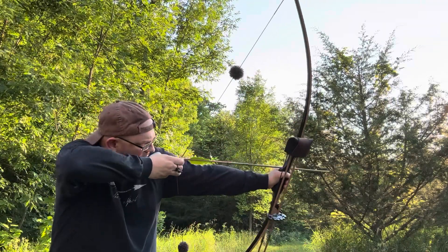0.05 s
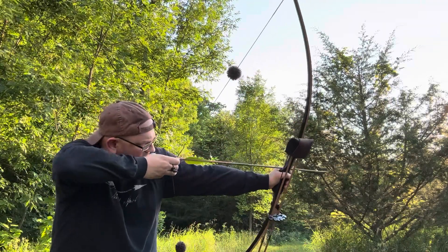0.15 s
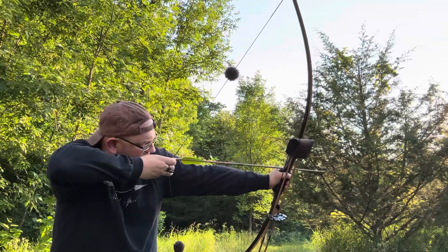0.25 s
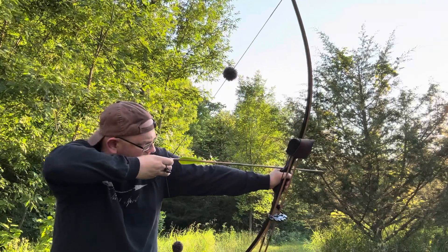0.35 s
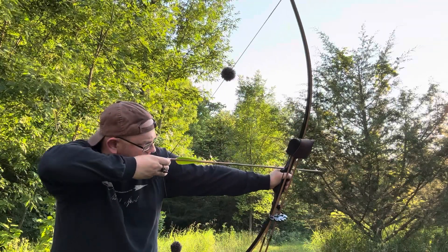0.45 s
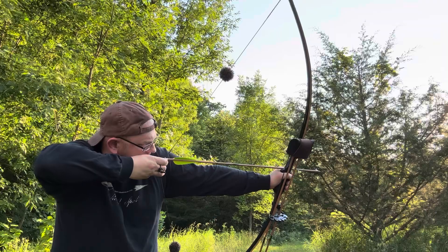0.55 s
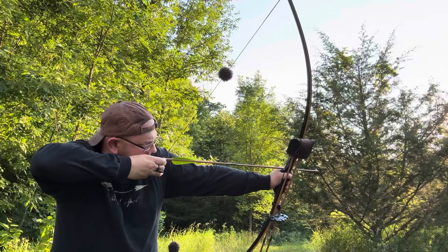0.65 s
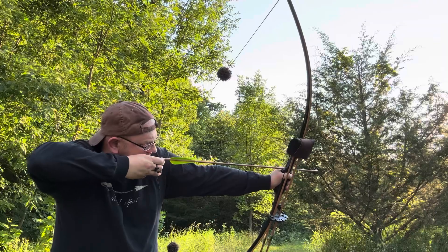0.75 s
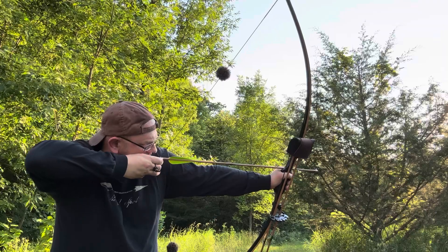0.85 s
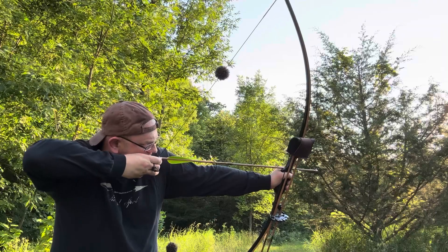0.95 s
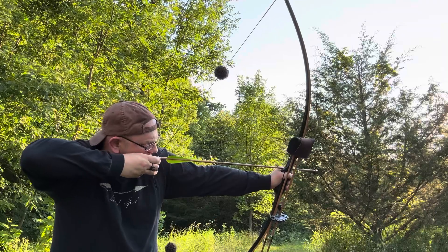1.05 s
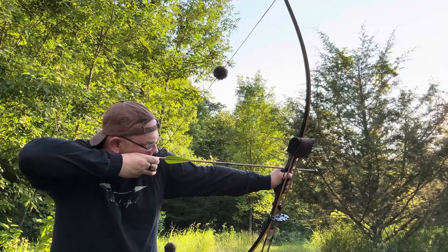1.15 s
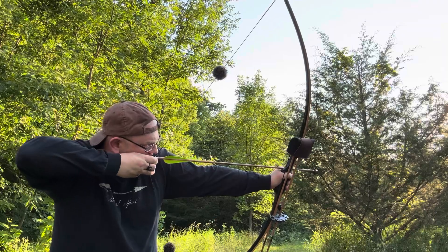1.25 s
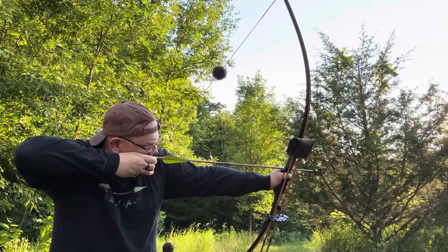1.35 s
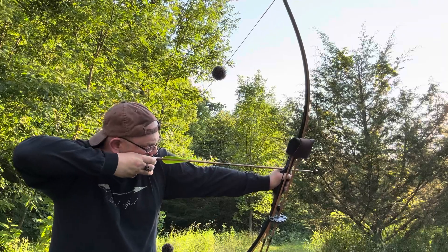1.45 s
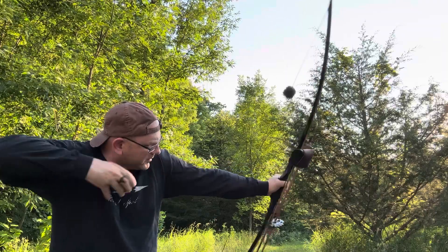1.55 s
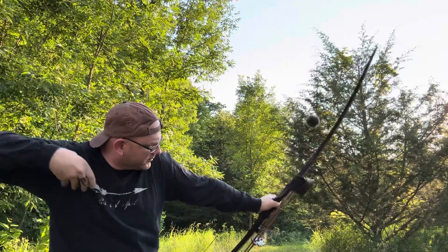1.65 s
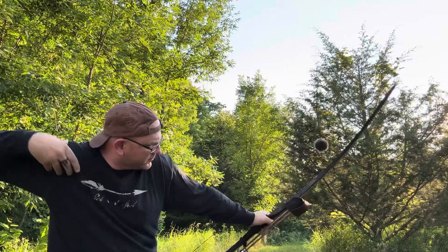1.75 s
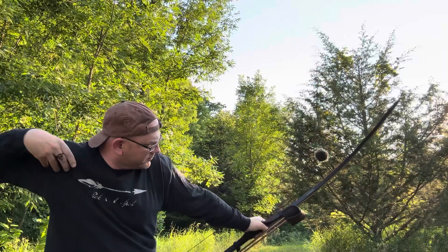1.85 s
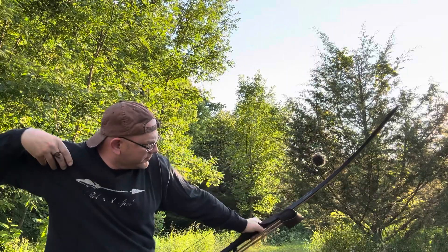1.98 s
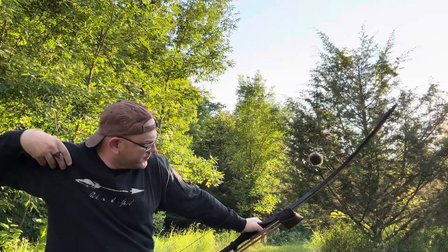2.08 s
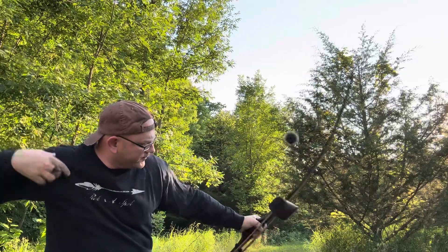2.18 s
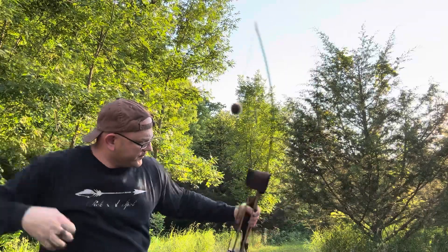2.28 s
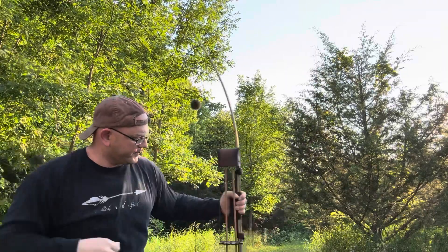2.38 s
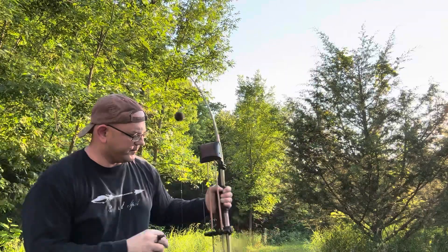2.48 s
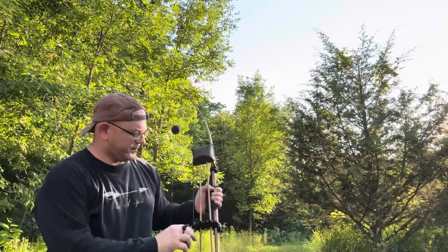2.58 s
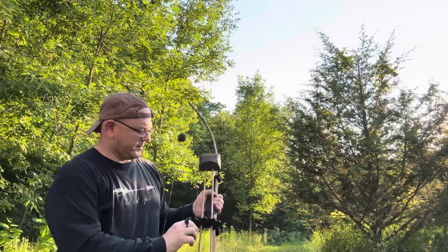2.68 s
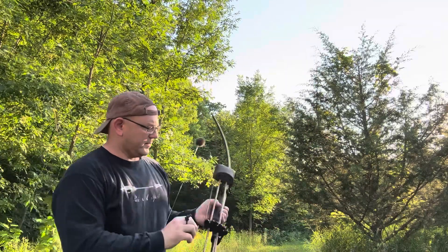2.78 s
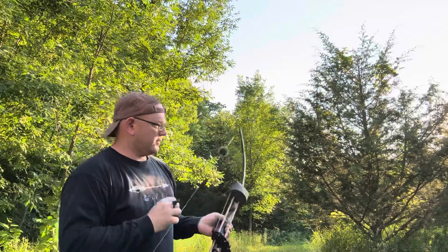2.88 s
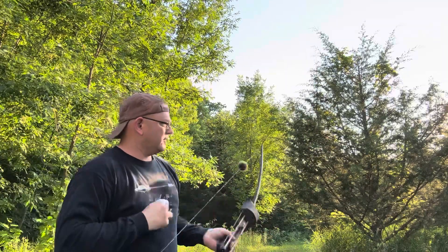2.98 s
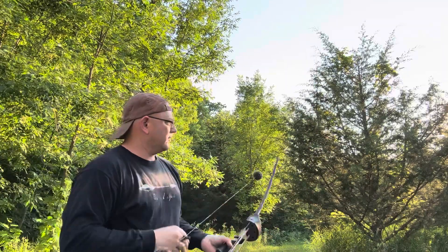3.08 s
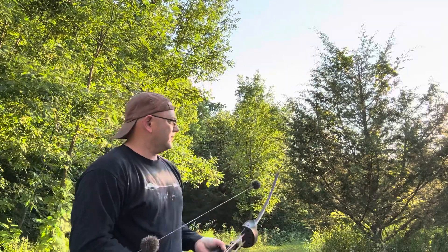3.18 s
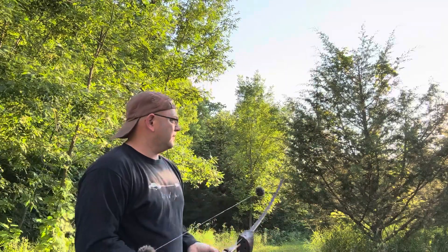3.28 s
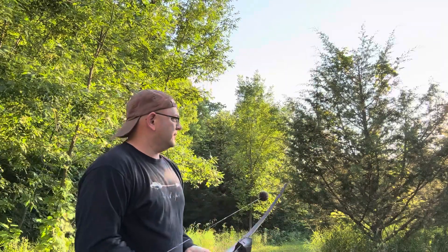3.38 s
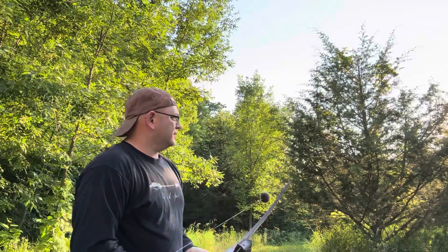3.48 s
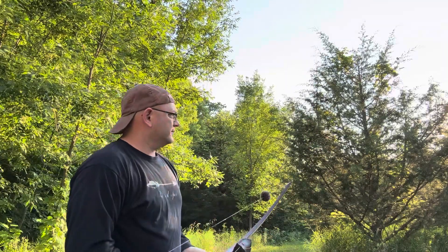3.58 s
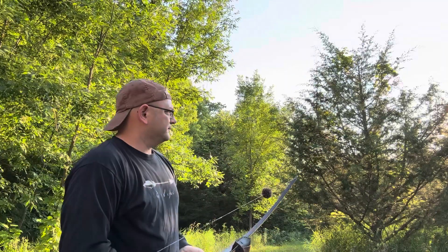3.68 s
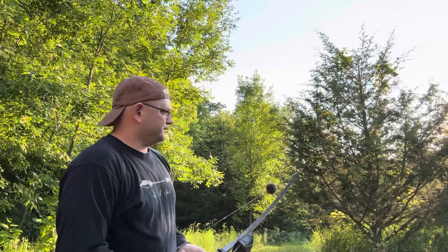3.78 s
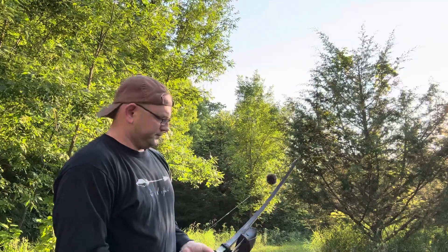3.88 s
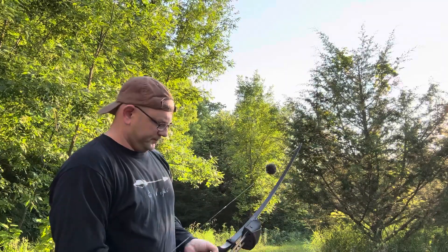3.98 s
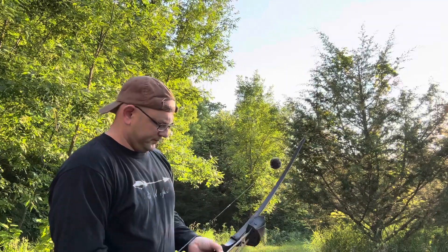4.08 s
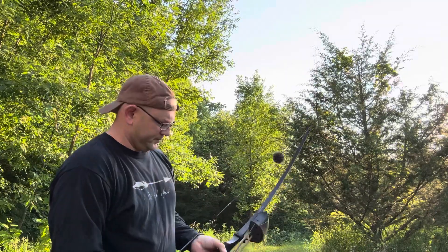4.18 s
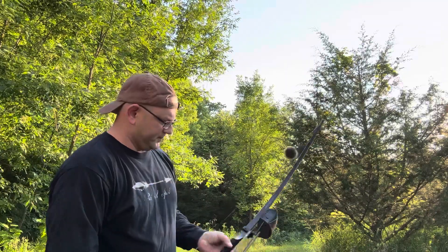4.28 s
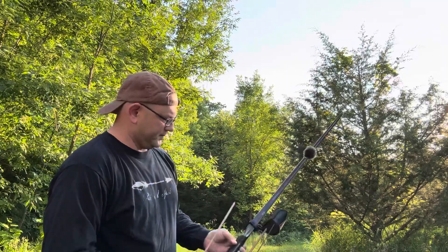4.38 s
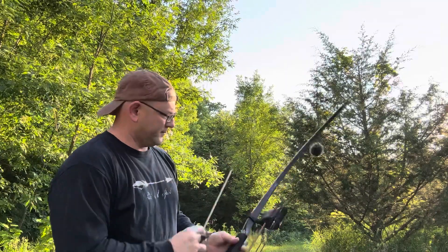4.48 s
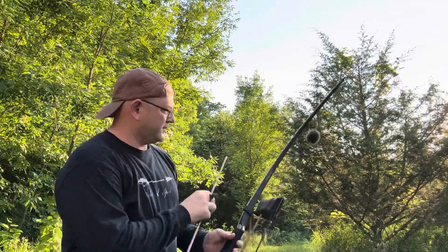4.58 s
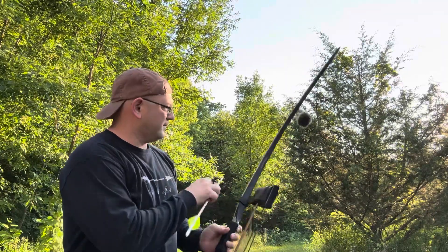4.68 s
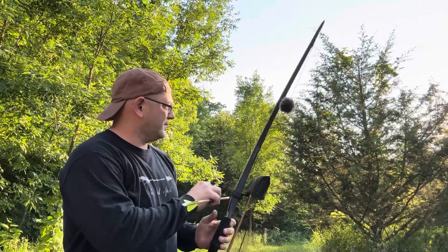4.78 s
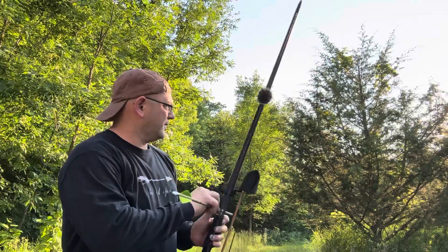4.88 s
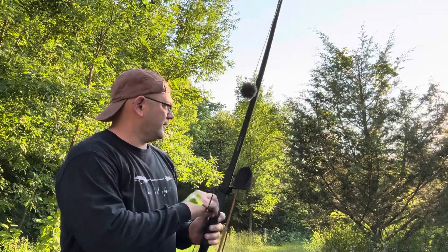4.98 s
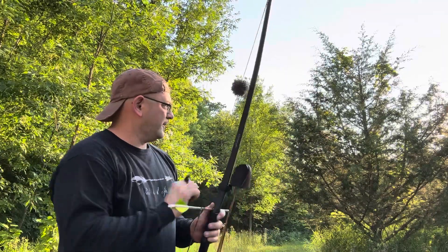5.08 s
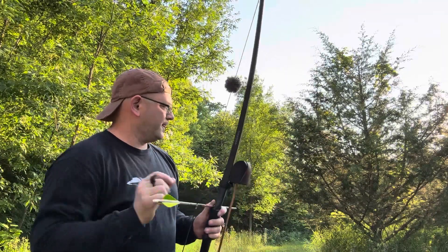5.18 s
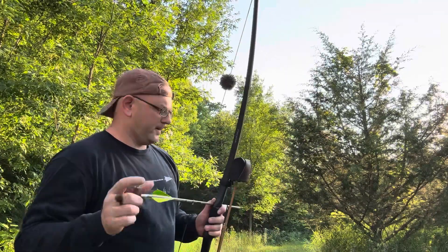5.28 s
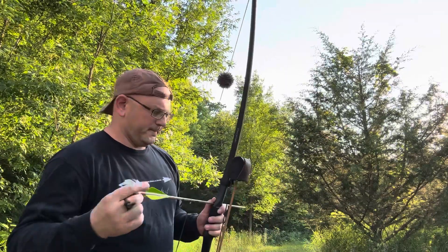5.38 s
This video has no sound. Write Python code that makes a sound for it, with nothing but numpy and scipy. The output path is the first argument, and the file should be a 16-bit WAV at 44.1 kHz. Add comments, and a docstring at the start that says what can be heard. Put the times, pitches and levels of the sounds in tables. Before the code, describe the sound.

A quiet grassy clearing heard from one microphone near the archer: low far traffic, a droning engine that swells softly around 1 s, faint leaf hiss and high insect trills, stronger from 2 to 3.5 s. A far buzzy bird calls at 0.1 s. At 1.47 s the longbow releases close by, a very short bright crack with shaft scrape and low limb thump. At 1.68 s a minute falling chirp leads straight into the arrow smacking the target farther off, with a boomy thud and echoes from the trees. Sleeves rustle from 2.4 s, strongest near 3.1 s. The bird buzzes again at 3.35 to 3.65 s, ending on a clear accent. Around 4.0 to 4.2 s the next arrow rubs grittily and knocks, snapping out of its clip with a crisp click at 4.24 s. Shaft knocks come at 4.9 s, finger slides at 5.15 s, then two tiny quick chirps and a rustle at 5.4 s.

```python
"""A grassy clearing, one microphone: far traffic rumbles, an engine swells, insects trill, sleeves rustle, a bird buzzes.
Close by, a longbow is shot: a crack of ringing modes, scrapes of coloured noise, a low thump of the limbs.
A fifth of a second later, on the heels of a tiny falling glide, the arrow smacks into the target farther off,
and the trees echo. The next arrow is taken up with rustles, slides of gritty noise and clicks; two more glides end it.
Insects are narrow bands of noise; the bird and the glides are swept sines; echoes are decaying noise in bands."""
import sys
import numpy as np
from scipy import signal
from scipy.fft import rfft, irfft, next_fast_len
from scipy.io import wavfile

SR = 44100
rng = np.random.default_rng(int(sys.argv[2]) if len(sys.argv) > 2 else 0)


def generate_wav(sig):
    """Save sig (samples, or channels by samples) to the path in sys.argv[1] as 16-bit PCM at SR."""
    pcm = np.round(np.clip(np.atleast_2d(sig).T, -1, 1) * 32767).astype(np.int16)
    wavfile.write(sys.argv[1], SR, pcm)


N = 239707
TIME = np.arange(N) / SR


# In all tables: t60/s is the time to fall by 60 dB, rise/s the time of the last 10 dB up to the peak.
# Colours give only the shape of a spectrum; the noise made from them has unit power.


def amp(db):
    """Decibels to gain."""
    return 10 ** (np.asarray(db) / 20)


def rms_one(x):
    """Scale to unit power."""
    return x / np.sqrt(np.mean(x ** 2) + 1e-20)


def at_hz(rows, hz):
    """Each column of a spectrum at the given frequencies, read along a logarithmic axis."""
    points, *columns = np.transpose(rows)
    return [np.interp(np.log(hz), np.log(points), column) for column in columns]


def drift(rate):
    """Random wander about zero, with a new target 'rate' times a second."""
    return np.interp(TIME * rate, np.arange(N), rng.standard_normal(N))


def noise(colour, grain_db=0):
    """Noise of a given colour; uneven grain sizes make it gritty."""
    size = next_fast_len(N)
    grains = rng.standard_normal(N) * amp(grain_db * drift(2500))
    bins_hz = np.arange(size // 2 + 1) * SR / size + 1e-3   # just above zero for the logarithm
    gain = amp(at_hz(colour, bins_hz)[0])
    return rms_one(irfft(rfft(grains, size) * gain, size)[:N])


def band(x, low_hz, high_hz, order=2):
    """Causal band-pass."""
    edges = np.clip([low_hz, max(high_hz, 1.2 * low_hz)], 10, .47 * SR)
    return signal.sosfilt(signal.butter(order, edges, "band", fs=SR, output="sos"), x)


def whistle(hz):
    """A unit-power sine that follows a pitch curve."""
    return np.sqrt(2) * np.sin(2 * np.pi * np.cumsum(hz) / SR)


def held(start, length, attack, release):
    """Envelope that fades in, holds at one and fades out within its length."""
    fade_in = (TIME - start) / attack
    fade_out = (start + length - TIME) / release
    return np.clip(np.minimum(fade_in, fade_out), 0, 1)


def swell(s, db, rise, t60):
    """Envelope that grows to a peak at s and dies away, both exponentially."""
    growing_db = 10 * (TIME - s) / rise
    dying_db = -60 * (TIME - s) / t60
    return amp(db + np.maximum(np.where(TIME < s, growing_db, dying_db), -200))


def strokes(rows):
    """Each rubbing stroke builds up, holds and dies away; their powers add."""
    power = 0
    for s, db, rise, hold, t60 in rows:
        before_db = 10 * np.maximum(s - TIME, 0) / rise
        after_db = 60 * np.maximum(TIME - s - hold, 0) / t60
        power = power + amp(db - np.minimum(before_db + after_db, 200)) ** 2
    return np.sqrt(power)


def strike(s, modes, contact):
    """A blow sets every mode ringing; a longer contact lets them build up more slowly."""
    age = np.clip(TIME - s, 0, 1)
    live = (age > 0) & (age < 1)
    t, out = age[live], np.zeros(N)
    for k, (hz, db, t60) in enumerate(modes):
        decay = np.exp(-np.log(1000) * t / t60)
        out[live] += (-1) ** k * amp(db) * decay * np.sin(2 * np.pi * hz * t)   # signs alternate
    return out * (1 - np.exp(-age / contact))


def radiated(s, db, low_hz, high_hz):
    """Summed over all directions, a crack is a broad, smooth pulse."""
    return amp(db) * band(signal.unit_impulse(N, round(s * SR)), low_hz, high_hz, order=1)


# Echoes of the clearing, near from ground and bushes, far from the trees; each source adds its own levels:
# f/Hz, near level/dB, near t60/s, far level/dB, far t60/s
CLEARING_ECHOES = [(100, -8, 0.46, -2.5, .8), (400, 0.5, .22, -1, .9), (895, 3, 0.2, -2, 0.57),
                   (2290, 1.5, 0.19, -1, 0.8), (5000, -1, .23, 3, 0.49), (7900, 1, 0.29, 0, 0.6),
                   (11000, -3, .18, -10.5, .35), (15000, -6.5, .16, -16.5, .25)]


def echoes(x, near_db, far_db):
    """Dense scatter from nearby, then a long faint return from the trees that loses its treble first."""
    t, response = TIME[:SR], 0
    edges = np.geomspace(60, 17000, 13)
    for low, high in zip(edges, edges[1:]):
        near, near_t60, far, far_t60 = at_hz(CLEARING_ECHOES, np.sqrt(low * high))
        near_path = (near + near_db, near_t60, .006)
        far_path = (far + far_db, far_t60, .025)
        for db, t60, build_s in (near_path, far_path):
            shape = np.exp(-np.log(1000) * t / t60) * (1 - np.exp(-(t / build_s) ** 2))
            scatter = band(rng.standard_normal(SR), low, high)
            response = response + amp(db) * scatter * shape / np.linalg.norm(shape)
    return signal.fftconvolve(x, response)[:N]


# Colour of the far traffic: f/Hz, level/dB
TRAFFIC_COLOUR = [(20, -42.5), (35, -20.5), (55, -1), (80, 1), (130, 3.5), (170, -9), (225, -9.5),
                  (280, -14), (400, -17.5), (750, -15), (1000, -23), (1700, -38.5), (3000, -43),
                  (5000, -65)]
# Colour of the rough part of the engine's drone: f/Hz, level/dB
ENGINE_COLOUR = [(60, -23.5), (95, -3.5), (120, 0.5), (140, -6), (210, -11.5), (300, -31)]
# Colour of the hiss of leaves: f/Hz, level/dB
LEAF_COLOUR = [(1500, 10.5), (3000, 3), (6000, 4), (10000, -11.5), (16000, -32)]
# The far engine drones on, fading, and swells once
ENGINE_DB, ENGINE_FADE_DB_PER_S, ENGINE_ONSET_S = -57.5, 2.5, 0.69
ENGINE_PEAK_S, ENGINE_PEAK_DB, ENGINE_SWELL_S = 1.06, -50.5, .36


def background(engine_hz=116, hum_hz=210):
    """Far traffic, one droning engine rising out of it, a faint steady hum and a hiss of leaves."""
    traffic = amp(-58.78) * noise(TRAFFIC_COLOUR)
    tone = amp(-4) * whistle(engine_hz + 2.2 * drift(12))
    roughness = amp(-2.5) * rms_one(band(noise(ENGINE_COLOUR), 50, 350))
    onset = np.minimum(TIME / ENGINE_ONSET_S, 1) ** 2
    receding = amp(ENGINE_DB - ENGINE_FADE_DB_PER_S * TIME) * onset
    swelling = amp(ENGINE_PEAK_DB) * np.exp(-((TIME - ENGINE_PEAK_S) / ENGINE_SWELL_S) ** 2)
    engine = (receding + swelling) * (tone + roughness)
    hum = amp(-70.5) * whistle(hum_hz + 2 * drift(5.4))
    leaves = amp(-78.5) * noise(LEAF_COLOUR)
    return traffic + engine + hum + leaves


# Insects that pulse and swell: f/Hz, mean level/dB
CHIRPERS = [(5280, -86.5), (5680, -86)]
# Bouts of one trilling insect: start t/s, length/s, level/dB
TRILLS = [(1.0, .9, -80), (2.04, 1.52, -77)]
TRILL_FADE_S = 0.11


def insects(trill_hz=4900, swells_per_s=1.7):
    """Rasping wings make narrow bands: one insect trills in bouts, the others pulse and swell at a loose pace."""
    blur = [(20, 5.5), (170, 4), (330, -11), (800, -47), (2000, -91)]   # offset from centre f/Hz, level/dB
    bouts = sum(amp(db) * held(start, length, TRILL_FADE_S, TRILL_FADE_S) for start, length, db in TRILLS)
    out = bouts * noise(blur) * whistle(np.full(N, trill_hz))
    for k, (hz, db) in enumerate(CHIRPERS):
        swelling_db = 3 * (-1) ** k * whistle(swells_per_s + .4 * drift(3.6))   # they start out in opposition
        level = amp(db + swelling_db + 2.5 * drift(50))
        out = out + level * noise(blur) * whistle(hz + 60 * drift(9.1))
    return out


# Strokes of a sleeve as the arms move, before the grit and flicker:
# t/s, level/dB, rise/s, hold/s, t60/s
SLEEVE_STROKES = [(0.01, -71.5, .05, 0.016, 1.45), (1.348, -77.5, .008, .01, .08),
                  (2.46, -60.5, 0.098, 0.042, .22), (2.62, -65.5, .015, .003, .25),
                  (2.72, -72.5, .03, .15, .5), (2.975, -60.5, 0.048, 0.017, .35),
                  (3.11, -53.5, 0.092, 0.082, 0.34), (3.42, -69, .04, 0.033, .9),
                  (3.70, -71, 0.16, 0.27, 0.48), (3.89, -68.5, 0.066, .005, .15),
                  (4.33, -74, .1, .29, 0.71), (5.41, -67, 0.042, 0.031, 0.23)]
# Colour of cloth on cloth: f/Hz, level/dB
SLEEVE_COLOUR = [(250, -19.5), (450, -5.5), (850, -1), (1700, -3.5), (3600, 0), (7600, 0.5), (10000, -7),
                 (12500, -11.5), (16000, -12)]
# The treble gains this many dB for each dB of stroke above the plain level
SLEEVE_BRIGHTENS, SLEEVE_PLAIN_DB = .2, -67


def sleeves():
    """Cloth on cloth: the harder the stroke, the brighter its grit."""
    level = strokes(SLEEVE_STROKES)
    cloth = noise(SLEEVE_COLOUR, grain_db=3)
    treble_gain = (level / amp(SLEEVE_PLAIN_DB)) ** SLEEVE_BRIGHTENS
    extra_treble = (treble_gain - 1) * band(cloth, 6500, 16000, order=1)
    return level * (cloth + extra_treble) * amp(1.5 * drift(70))


def handling():
    """Cloth rubs, and the next arrow slides and knocks on the bow, with the clearing's echoes."""
    rubs = sleeves() + slides() + ticks()
    return rubs + echoes(rubs, near_db=-14.5, far_db=-27.5)


# Buzzy bird calls; the level is before the closing accent and the flutter, the echo is a trim:
# start t/s, length/s, closing pitch f/Hz, fall to it f/Hz, level/dB, echo level/dB
BUZZ_CALLS = [(.09, .30, 2602, 169, -67.5, 4), (3.355, .308, 2445, 440.6, -63, -3.5)]
BUZZ_ATTACK_S, BUZZ_RELEASE_S = 0.02, 0.0057
BUZZ_ACCENT_DB, BUZZ_ACCENT_S = 8.5, .04   # the whistle at the end is accented
BUZZ_FALL_S = .13   # the pitch settles
# The sweep opens quickly, narrows with this power of the call's progress, and is almost gone in the whistle
BUZZ_OPEN_S, BUZZ_SWEEP_HZ, BUZZ_NARROWING = .025, 316, 3.44
BUZZ_WHISTLE_S, WHISTLE_SWEEP_HZ = 0.02, 30


def buzzes(buzz_hz=85):
    """A far bird sweeps its whistle up and down fast enough to buzz; each call sinks, narrows, ends on an accent."""
    out = 0
    for start, length, closing_hz, fall_hz, db, echo_db in BUZZ_CALLS:
        age = np.clip(TIME - start, 0, length)
        hz = closing_hz + fall_hz * np.exp(-age / BUZZ_FALL_S)
        progress = np.minimum(age / (length - BUZZ_WHISTLE_S), 1)
        opening = 1 - np.exp(-age / BUZZ_OPEN_S)
        sweep_hz = WHISTLE_SWEEP_HZ + BUZZ_SWEEP_HZ * opening * (1 - progress ** BUZZ_NARROWING)
        flutter = whistle(buzz_hz * (1 + .07 * drift(40))) / np.sqrt(2)
        accent_db = BUZZ_ACCENT_DB * np.exp((age - length) / BUZZ_ACCENT_S)
        pulsing_db = 2.95 * np.roll(flutter, SR // 400)   # loudness lags pitch by 2.5 ms
        level = held(start, length, BUZZ_ATTACK_S, BUZZ_RELEASE_S) * amp(db + accent_db + pulsing_db)
        call = level * whistle(hz + sweep_hz * (flutter + .25 * drift(200)))
        out = out + call + amp(echo_db) * echoes(call, near_db=.5, far_db=-2.5)
    return out


# Light knocks and brushes of shaft, nock and fingers on the bow:
# t/s, level/dB, low edge f/Hz, high edge f/Hz, t60/s
TICKS = [(1.4358, -56, 700, 4500, 0.013), (1.5094, -18.5, 3460, 8300, .004), (2.492, -51, 397, 3510, 0.053),
         (3.09, -54, 3265, 5500, 0.22), (3.2, -46.5, 202, 1500, .05), (4.006, -44.5, 349, 2150, 0.043),
         (4.049, -42, 3270, 7850, .008), (4.157, -41.5, 396, 4000, .03), (4.47, -51.5, 403, 2486, 0.02),
         (4.552, -56, 2000, 12780, 0.0094), (4.897, -38.5, 886, 5300, 0.019),
         (4.9756, -40, 1200, 6600, 0.022)]
# Knocks that set the shaft ringing: t/s, level added to the modes/dB
SHAFT_KNOCKS = [(4.8964, -0.5), (4.976, -14)]
# Ringing of the arrow shaft, before the knock's level: f/Hz, level/dB, t60/s
SHAFT_MODES = [(1830, -45, 0.039), (2145, -46, 0.03), (2980, -37.5, .02)]


def ticks():
    """Each light knock is a brief burst in its own band; two of them ring the shaft."""
    white = rng.standard_normal(N)
    out = np.zeros(N)
    for s, db, low, high, t60 in TICKS:
        out += swell(s, db, .0003, t60) * rms_one(band(white, low, high, order=3))
    for s, db in SHAFT_KNOCKS:
        out += amp(db) * strike(s, SHAFT_MODES, contact=0.00043)
    return out


# Bow and arrow as the string lets go: f/Hz, level/dB, t60/s
RELEASE_MODES = [(520, -17, 0.091), (783, -20, 0.042), (965, -11.5, 0.027), (1230, -16, 0.026),
                 (1865, -11, .012), (2710, -14, .012), (4200, -10.5, .008), (4620, -9.5, .009),
                 (5900, -7.5, .005), (6900, -28, 0.007), (7780, -19, .007), (9970, -19, 0.0046),
                 (13800, -16, .004)]
# Limbs and string at the end of their travel: f/Hz, level/dB, t60/s
LIMB_MODES = [(72, -26, .09), (140, -25, .05), (226, -33.5, 0.23), (300, -26.5, .05), (404, -29, .05),
              (600, -25.5, .05)]
# The shaft gliding, then scraping past the bow: t/s, level/dB, rise/s, t60/s
SCRAPES = [(1.471, -57, 0.02, 0.041), (1.477, -22.5, 0.0013, .05), (1.4907, -21, 0.0043, .05)]
# Colour of the scrape: f/Hz, level/dB
SCRAPE_COLOUR = [(150, -33), (250, -3.5), (938, -1.5), (1950, -7.5), (3520, -6.5), (4900, -14),
                 (5540, -10.5), (6140, -17.5), (7700, -18), (9010, -27), (16000, -34)]
RELEASE_S, THUMP_S = 1.4748, 1.493


def bow():
    """Close by: crack of the release, scrape of the shaft, thump of the limbs."""
    crack = band(strike(RELEASE_S, RELEASE_MODES, contact=.0002), 380, 19000)   # the crack carries little bass
    scrape = sum(swell(*row) for row in SCRAPES) * noise(SCRAPE_COLOUR, grain_db=2.5)
    thump = strike(THUMP_S, LIMB_MODES, contact=0.0045)
    outward = radiated(RELEASE_S, db=12, low_hz=500, high_hz=4400) + scrape + thump
    return crack + scrape + thump + echoes(outward, near_db=-15, far_db=-28.5)


# Tiny high glides, falling or rising: t/s, pitch at the middle f/Hz, glide/(Hz per s), level/dB
GLIDES = [(1.678, 4200, -290000, -43.5), (5.419, 4700, 140000, -49.5), (5.43, 4430, -260000, -44.5)]
GLIDE_WIDTH_S = .0023


def quick_glides():
    """A few milliseconds of sine, its pitch sliding fast under a bell-shaped envelope."""
    out = 0
    for s, hz, hz_per_s, db in GLIDES:
        age = np.clip(TIME - s, -5 * GLIDE_WIDTH_S, 5 * GLIDE_WIDTH_S)
        envelope = np.exp(-(age / GLIDE_WIDTH_S) ** 2)
        out = out + amp(db) * envelope * whistle(hz + hz_per_s * age)
    return out + echoes(out, near_db=-3, far_db=-12)


# Arrow point entering the target: f/Hz, level/dB, t60/s
IMPACT_MODES = [(372, -33, .06), (908, -21, 0.037), (1060, -21.5, 0.029), (1530, -26.5, .025),
                (2220, -12.5, .012), (2560, -17, 0.015), (3740, -19, 0.012), (4557, -25.5, 0.024),
                (6135, -19.5, .008), (7750, -24, 0.011), (9890, -28, .005), (13300, -34, .004)]
# The shaft burrowing into the packing: t/s, level/dB, rise/s, t60/s
BURROW = [(1.690, -25.5, .001, 0.027), (1.705, -31, .006, 0.028)]
# Colour of the burrowing: f/Hz, level/dB
BURROW_COLOUR = [(88, -32), (150, -3), (366, 4), (659, -22), (1000, -3.5), (1580, -25), (2400, -11),
                 (5120, -21.5), (7770, -23.5), (14000, -61)]
# The body of the target giving way: f/Hz, level/dB, t60/s
TARGET_MODES = [(85.88, -26, 0.12), (151, -24.5, 0.17), (204, -18.5, 0.054), (250.5, -30.5, 0.14),
                (322, -31, 0.067), (396, -30, 0.068), (488, -30.5, .07)]
IMPACT_S, THUD_S = 1.6881, 1.703


def target():
    """The point cracks in, the shaft burrows, the whole target booms; being farther off, it echoes more."""
    crack = strike(IMPACT_S, IMPACT_MODES, contact=.0003)
    burrow = sum(swell(*row) for row in BURROW) * noise(BURROW_COLOUR, grain_db=-2)
    thud = strike(THUD_S, TARGET_MODES, contact=0.0015)
    pulse = radiated(IMPACT_S, db=10, low_hz=494, high_hz=2605)
    outward = band(pulse + burrow + thud, 60, 9000)   # air dulls the long paths
    return crack + burrow + thud + echoes(outward, near_db=-10.5, far_db=-19.5)


# Strokes of the next arrow, one list through the quiver, one through the fingers, before the flicker:
# t/s, level/dB, rise/s, hold/s, t60/s
SLIDE_STROKES = [
    [(4.004, -52.5, 0.0042, .003, .03), (4.02, -61, .015, 0.014, 0.11), (4.077, -53, .001, .005, .08),
     (4.15, -46, 0.037, .012, .06), (4.195, -60, .01, 0.0044, 0.043)],
    [(4.92, -69.5, 0.013, .04, .2), (5.0, -66.5, 0.011, .004, .2), (5.06, -73, .05, .06, .2),
     (5.128, -47.5, 0.0047, .026, 0.052), (5.177, -52.5, 0.015, 0.0066, .17),
     (5.268, -62, .03, 0.014, 0.048)],
]
# One colour for each slide, quiver then fingers: f/Hz, level/dB
SLIDE_COLOURS = [
    [(250, -15), (500, -2.5), (1000, -4.5), (2200, -5), (4200, 1), (7800, -3.5), (10000, -7), (12500, -17),
     (16000, -15.5)],
    [(400, -22), (1000, -10), (2200, -5.5), (4200, 1.5), (7800, -1), (10000, -18), (12500, -23),
     (16000, -22)],
]


def slides():
    """The next arrow rubs through the quiver, then the fingers: gritty noise whose level flickers."""
    rubbing = 0
    for rows, colour in zip(SLIDE_STROKES, SLIDE_COLOURS):
        rubbing = rubbing + strokes(rows) * noise(colour, grain_db=3.5)
    return rubbing * amp(2.6 * drift(100))


# The next arrow snapping out of its clip: f/Hz, level/dB, t60/s
SNAP_MODES = [(880, -33.5, 0.031), (1720, -29.5, 0.0082), (2500, -27.5, 0.0049), (3510, -24.5, 0.01),
              (4470, -20, 0.0098), (5400, -17.5, 0.0058), (5980, -19.5, 0.0088), (7670, -16.5, 0.0072),
              (8860, -14.5, 0.0032), (10800, -21, 0.0035), (13700, -26, 0.0026)]
SNAP_S = 4.2369


def snap(bounce_s=.018):
    """The arrow springs out of its clip; the sound scatters off body and bow and bounces off the ground."""
    click = strike(SNAP_S, SNAP_MODES, contact=.00004)
    off_body = swell(SNAP_S + 0.00092, -35, 0.0011, 0.036)
    off_ground = swell(SNAP_S + bounce_s, -50.5, 0.0045, 0.18)
    scatter = (off_body + off_ground) * rms_one(band(noise(SLEEVE_COLOUR), 300, 10000))
    bounce = amp(-25) * np.roll(click, round(bounce_s * SR))
    return click + scatter + bounce


def scene():
    """All sources at one microphone."""
    place = background() + insects() + buzzes() + quick_glides()
    shooting = handling() + bow() + target() + snap()
    return (place + shooting)[None]


def record(dry):
    """The microphone sheds the deep bass below 42 Hz; the top is cut steeply at 16.2 kHz."""
    thinned = signal.sosfilt(signal.butter(4, 42, "high", fs=SR, output="sos"), dry)
    return signal.sosfilt(signal.ellip(10, .1, 80, 16200, fs=SR, output="sos"), thinned)


dry = scene()
out = record(dry)
generate_wav(out)
```